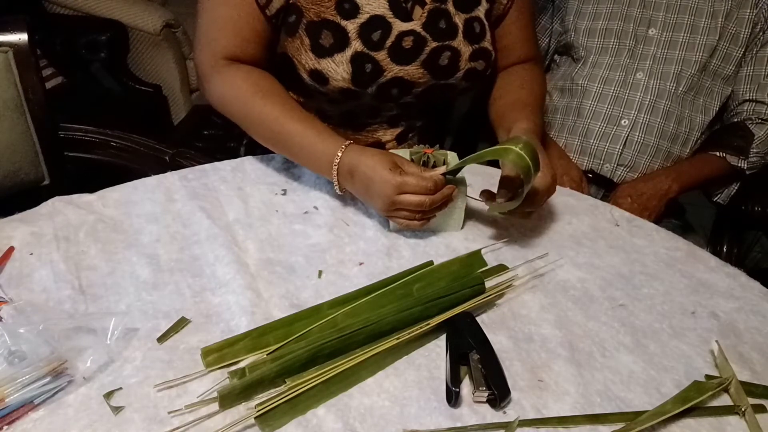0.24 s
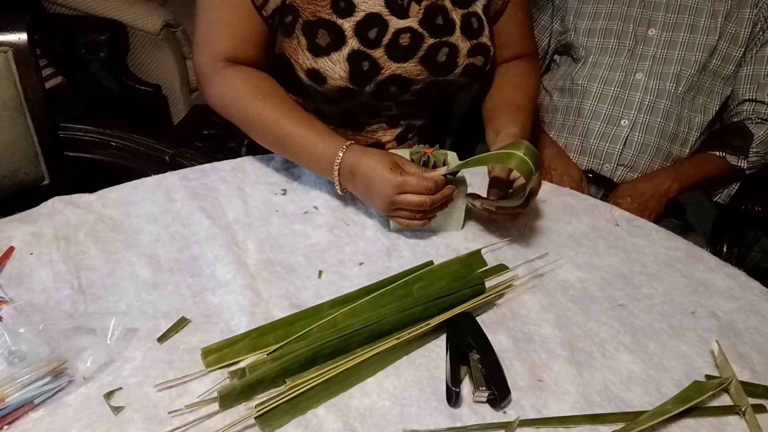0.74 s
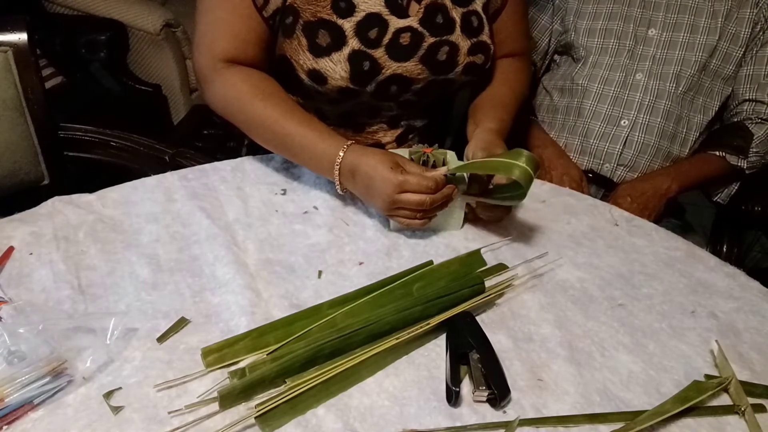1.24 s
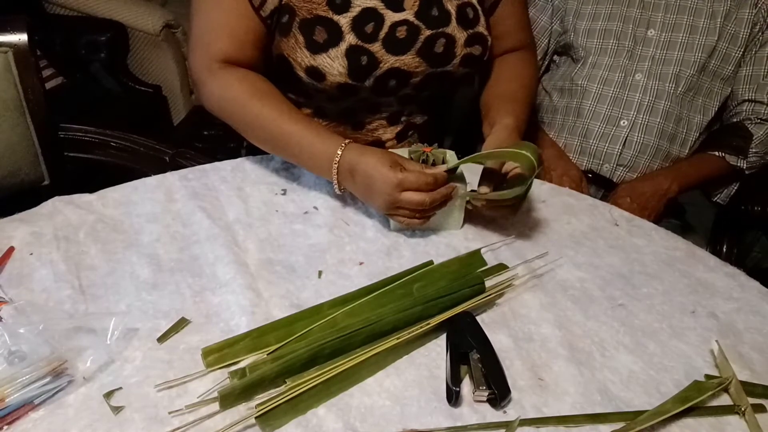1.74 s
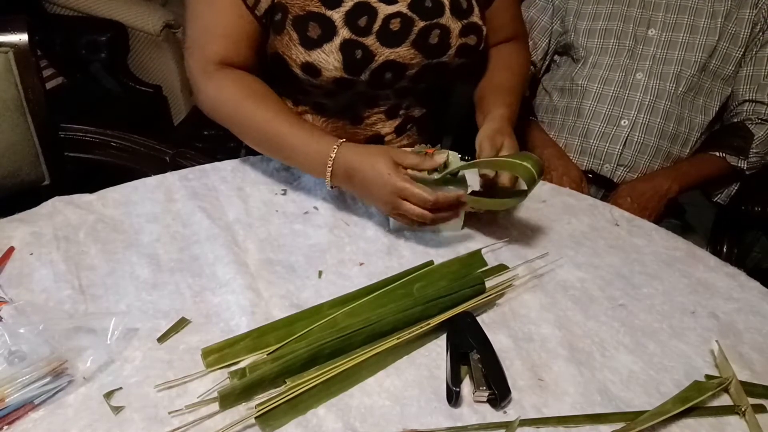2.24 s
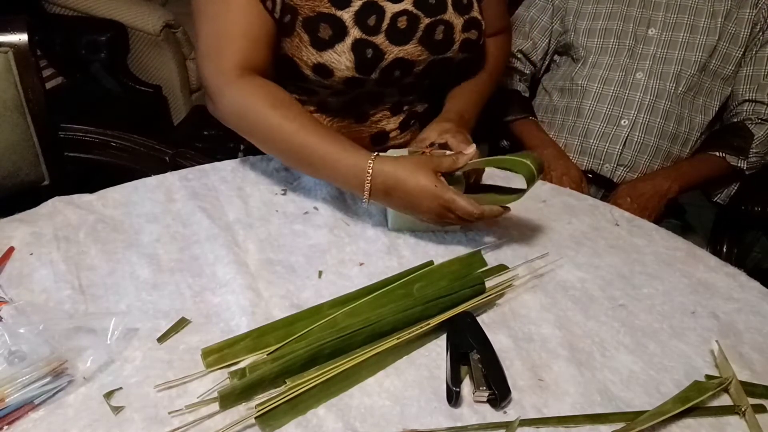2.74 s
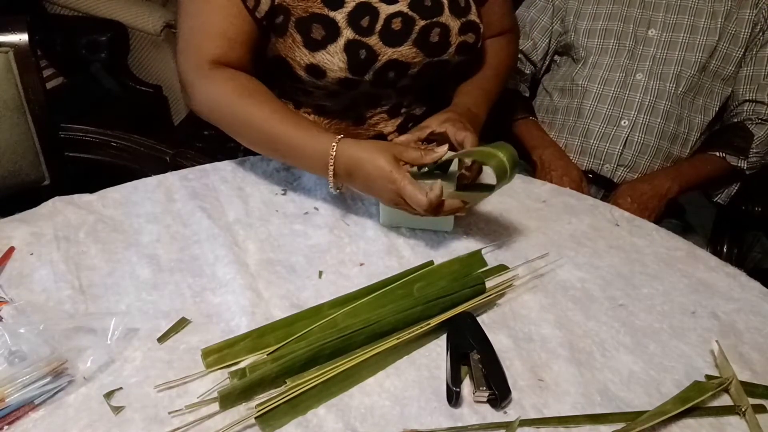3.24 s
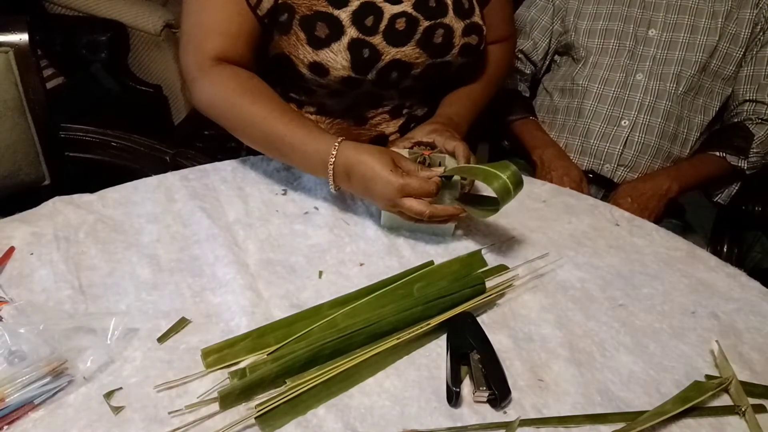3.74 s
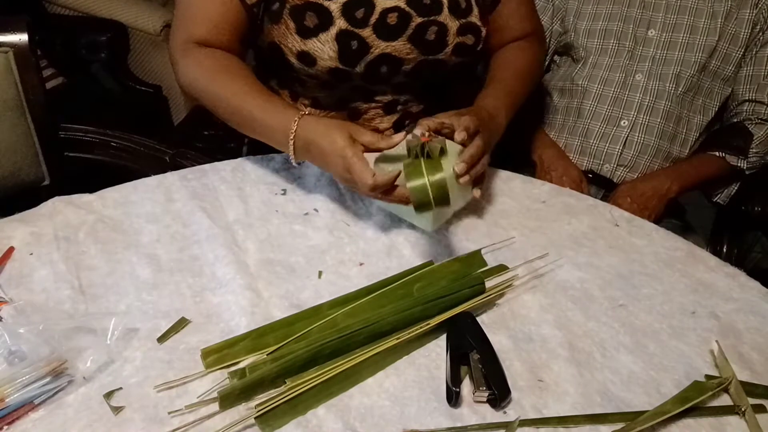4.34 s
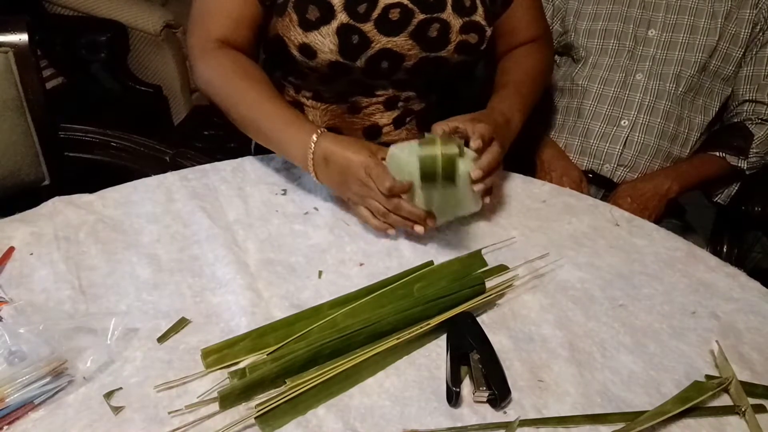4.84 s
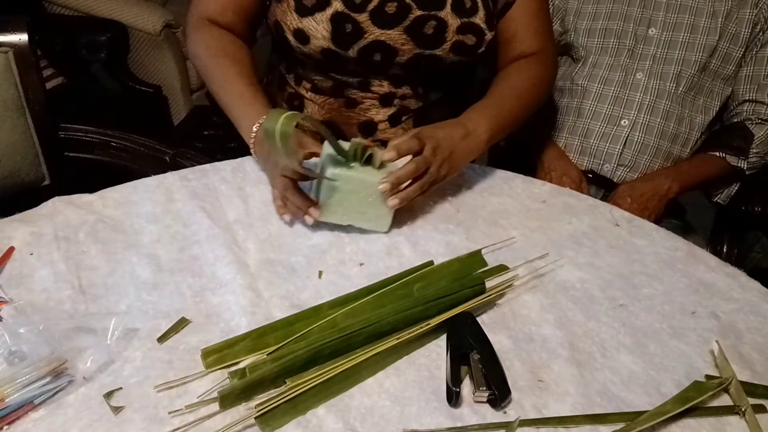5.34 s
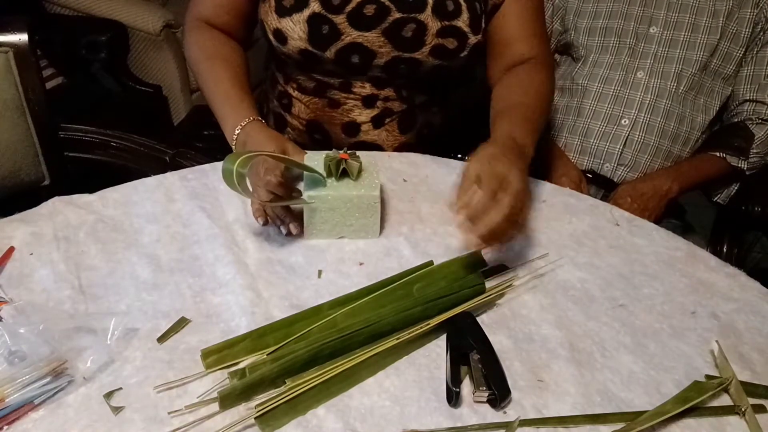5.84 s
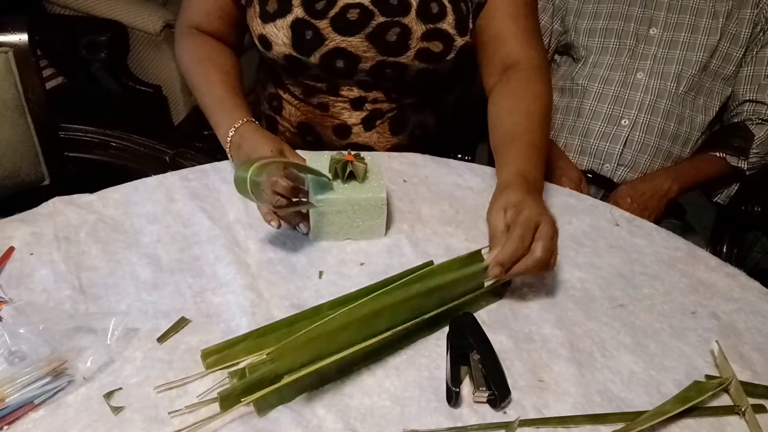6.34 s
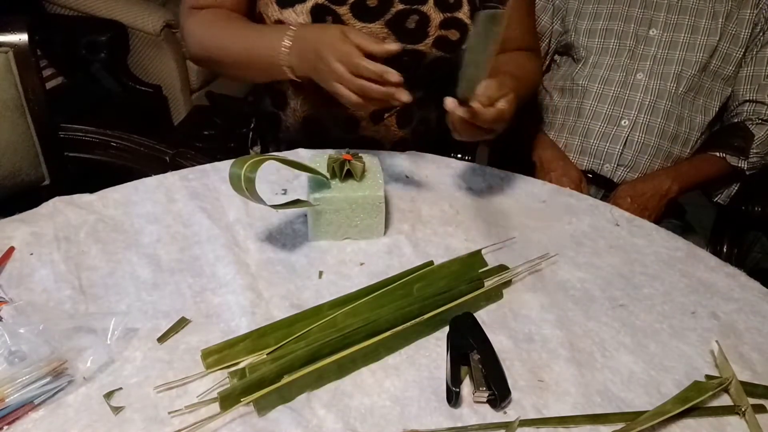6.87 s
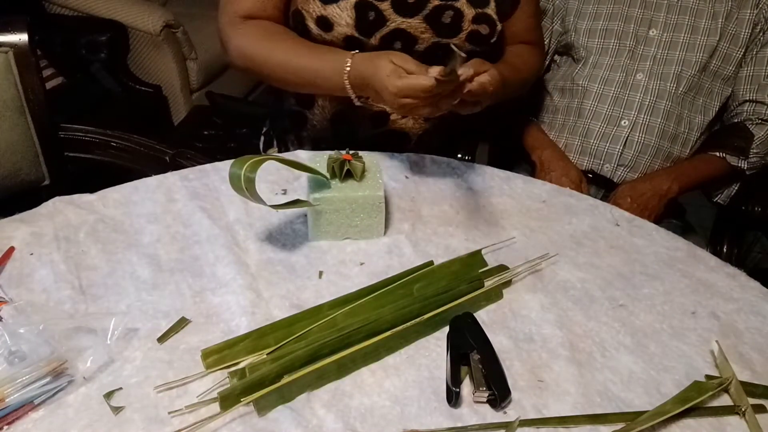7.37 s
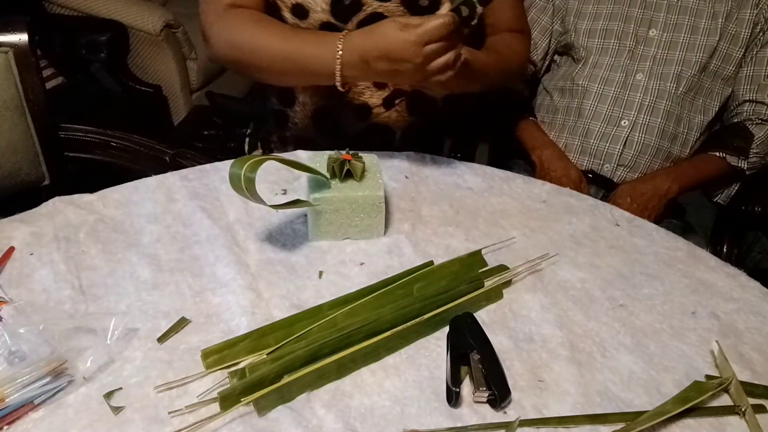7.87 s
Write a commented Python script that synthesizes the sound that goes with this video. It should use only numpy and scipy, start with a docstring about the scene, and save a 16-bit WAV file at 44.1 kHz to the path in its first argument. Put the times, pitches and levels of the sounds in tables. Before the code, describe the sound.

Brittle leaf sounds at a cloth-covered table, heard near and in stereo over low room noise. First come quick scratchy crackles with a slight low foam squeak, then quiet, then two bold rustling scrapes with sharp cracks, a short hollow knock and softer shuffling. Later a leaf strip is picked out with rapid clicks, and soft low bumps accompany its last rustling.

```python
"""Stiff leaf strips scrape as hands bend them and push them into a foam block on a cloth-covered table.
The scrape is stick-slip friction: noise in dense tiny slips, coloured by leaf, edges, block and table.
Snapping fibres are short decaying sines with a crack of noise, then a burst of slips.
Knocks of the block are millisecond pushes that ring the table top, with noisy rebounds.
A short indoor echo follows; room hum and microphone hiss lie behind, in a close stereo pair."""
import sys
import numpy as np
from scipy import signal
from scipy.fft import rfft, irfft
from scipy.io import wavfile
from scipy.ndimage import uniform_filter1d

SR = 44100
rng = np.random.default_rng(int(sys.argv[2]) if len(sys.argv) > 2 else 0)


def dump_mix(stems):
    """Bounce the given channels to the path in sys.argv[1] as a 16-bit WAV at rate SR."""
    frames = np.atleast_2d(stems).T  # one column per channel
    limited = np.clip(frames, -1, 1)  # hard clip at full scale
    pcm = np.round(limited * 32767).astype(np.int16)
    wavfile.write(sys.argv[1], SR, pcm)


N = 357518
HZ = np.fft.rfftfreq(N, 1 / SR)

# Resonances of the table top, rung by rubbing and by knocks.
# Each row: frequency in Hz, bandwidth in Hz, relative level in dB.
TABLE_MODES = [(125, 22, -3.5), (161, 38, 2), (233.7, 32, 10.5), (293, 91, 1.5), (412, 77, -1.5)]


def gain_of(db):
    """Level to amplitude: 20 dB is a factor of ten."""
    return 10 ** (np.asarray(db) / 20)


def evened(x):
    """Energy normalization: scales a signal to rms 1."""
    return x / np.sqrt(np.mean(x ** 2) + 1e-20)


def read(points, hz):
    """Interpolates a spectral curve along logarithmic frequency."""
    point_hz, value = np.transpose(points)
    return np.interp(np.log(hz + 1), np.log(point_hz + 1), value)


def add(mix, start_s, sound):
    """Superposition: adds a sound to the mix in place, cut off at the end."""
    part = mix[..., round(start_s * SR):][..., :sound.shape[-1]]
    part += sound[..., :part.shape[-1]]


def colour(x, gain):
    """Linear filtering by a frequency response scaled so that white noise keeps its rms."""
    return irfft(rfft(x) * gain / np.sqrt(np.mean(abs(gain) ** 2)), N)


def modes(table):
    """Modal superposition: the complex response of damped resonators side by side."""
    response = 0
    for hz, width_hz, db in table:
        damping = 1j * HZ * width_hz
        response = response + gain_of(db) * damping / (hz ** 2 - HZ ** 2 + damping)
    return response


def pair(two, likeness):
    """Interchannel coherence: the right shares part of the left's signal, by frequency."""
    right_late_s = 0.000025  # the hands sit a little nearer the left microphone
    same = np.clip(read(likeness, HZ), 0, 1)
    left, other = rfft(two)
    delayed = left * np.exp(-2j * np.pi * HZ * right_late_s)
    right = same * delayed + np.sqrt(1 - same ** 2) * other
    return irfft([left, right], N)


def strokes():
    """Friction follows the hand's effort: each stroke swells and fades, and stroke powers add."""
    # Strokes of the hands. Each row: time of the peak in seconds, peak level of the scraping in dB,
    # rise in seconds, fall in seconds, then three drives over the scraping in dB: the thin hiss
    # of the edges, the flap of the broad leaf, the drive of the block.
    stroke_rows = [(0.17, -64.5, 0.17, 0.1, -13, -6, -9), (0.604, -40.5, 0.078, 0.12, 5, -20, 0.5),
                   (0.805, -42, 0.033, 0.091, 3.5, -17, 0), (0.976, -36, 0.13, 0.15, 3, -16.5, -0.5),
                   (1.212, -48, 0.038, 0.12, 2.5, -12, -4), (1.298, -58.5, 0.088, 0.51, 6, -5.5, -10),
                   (1.427, -55, 0.11, 0.07, 4.5, -3.5, -7.5), (1.49, -60.5, 0.25, 0.29, 5.5, -11, 7.5),
                   (2.034, -58, 0.25, 0.19, -1, -8, -4), (2.758, -54.5, 0.26, 0.35, 0, -4.5, -5),
                   (2.898, -44, 0.041, 0.13, 0, -13.5, -21), (3.031, -42, 0.12, 0.18, -4, -12, -14),
                   (3.097, -31.5, 0.061, 0.16, -2.5, -7.5, -18.5),
                   (3.28, -55.5, 0.51, 0.34, -1, -9.5, -16.5), (3.47, -57, 0.82, 0.2, 2.5, -9.5, -6.5),
                   (3.924, -48.5, 0.098, 0.24, -2, -13.5, -13.5), (4.117, -44, 0.19, 0.87, 0, -1.5, -12.5),
                   (4.204, -35, 0.084, 0.14, -4, -12, -14.5), (4.269, -39.5, 0.24, 0.062, -6, -18, -14.5),
                   (4.455, -51, 0.078, 0.11, -2, -18, -10), (4.6, -64.5, 0.63, 0.64, 3, -34, -7),
                   (4.75, -63.5, 0.34, 0.64, 2.5, 5.5, -11.5), (4.928, -50.5, 0.11, 0.1, -4, -11, -17),
                   (5.013, -47, 0.22, .14, -2.5, -17, -16), (5.153, -47, 0.34, 0.13, -3, -17, -20.5),
                   (5.41, -55.5, 0.17, 0.41, 4, -14.5, -11), (5.519, -56, 0.23, 0.18, -5, -6, 3.5),
                   (5.627, -48, 0.21, 0.1, -0.5, -15, -15), (6.075, -54.5, 0.15, 0.15, -9, -0.5, -27),
                   (6.145, -57.5, 0.18, 0.55, 1.5, 0, -9), (6.3, -60.5, 0.19, 0.36, -7.5, -4, -11),
                   (6.53, -69, 0.34, 0.69, -40, -5.5, -30), (7.01, -69.5, 0.13, 0.19, -17, -20, -17),
                   (7.135, -66, 0.12, 0.13, -31, -22, -18), (7.44, -55, 0.25, 0.16, -3.5, -5, -35),
                   (7.931, -55.5, 0.15, 0.34, -9, -9.5, -16)]
    drop_db, roundness = 32, 0.89  # drop over one rise or fall; 1 = pointed top, 2 = round
    fidget_db = -85  # the hands never lie quite still
    t = np.arange(0, N + 64, 64)[:, None] / SR
    peak_s, db, rise_s, fall_s, *share_db = np.transpose(stroke_rows)
    away = np.where(t < peak_s, (peak_s - t) / rise_s, (t - peak_s) / fall_s)
    power = gain_of(np.maximum(db - drop_db * away ** roundness, -300)) ** 2
    total = power.sum(axis=1)
    rows = [np.sqrt(total + gain_of(fidget_db) ** 2)]
    # the stroke strongest at the moment weighs most in the shares
    rows += [gain_of(power @ share / total) for share in share_db]
    return [np.interp(np.arange(N) / SR, t[:, 0], row) for row in rows]


def slips(per_s, spread_db, ring_s, smooth):
    """Stick-slip: noise jumps in loudness at random slips and decays; a few slips are larger."""
    happens = rng.random(N) < per_s / SR
    size = gain_of(spread_db * np.minimum(rng.exponential(1, N), 3)) * happens
    bumps = signal.lfilter([1], [1, -np.exp(-1 / (ring_s * SR))], size)
    loudness = smooth + evened(bumps)  # smooth is the steady part
    return evened(loudness * rng.standard_normal((2, N)))


def bend(x, patchy_db):
    """Bending shifts a leaf's resonances: patches of colour come and go around a moving peak."""
    # Centre of the leaf's brightest rustle as it bends. Each row: time in seconds, frequency in Hz.
    bright_path = [(.8, 4250), (2, 3250), (3.1, 4290), (4.2, 4300), (5.15, 3900), (5.62, 6360), (6.2, 3720),
                   (7.4, 4600)]
    hz, t, z = signal.stft(x, SR, nperseg=512)
    octaves = np.log2((hz[:, None] + 1) / np.interp(t, *np.transpose(bright_path)))
    peak = gain_of(1.71 * np.exp(-(octaves / 0.26) ** 2))
    # random gains smoothed over 4 frequency bins and 7 frames, the same in both channels
    patches = rng.standard_normal(z.shape[1:])
    patches = uniform_filter1d(uniform_filter1d(patches, size=4, axis=0), size=7, axis=1)
    gain = gain_of(patchy_db * evened(patches))
    gain = gain / np.sqrt(np.mean(gain ** 2))
    return signal.istft(z * peak * gain, nperseg=512)[1][:, :N]


def shake(crack, crumble):
    """Source and filter: one grainy drive passes leaf, edges and block, and through these the table."""
    # Spectra of the leaf's rustle and of its edges' hiss.
    # Each row: frequency in Hz, relative spectral density in dB.
    leaf_db, edge_db = [(1350, -85), (2300, -19), (2910, -1), (4070, -3.5), (4510, -0.5), (5110, -2.5),
                        (6320, -0.5), (8360, -11), (9000, -8.5), (11700, -19.5), (19800, -120)], [(4410, -102.5), (7500, 0.5), (8630, -12), (11700, 9), (15100, 4.5)]
    # Resonances of the broad leaf, of the loose strip once gripped, and of the foam block.
    # Each row: frequency in Hz, bandwidth in Hz, relative level in dB.
    flap_modes, strip_modes, block_modes = [(1077, 580, -1), (1447, 120, 1), (1783, 48, 0.5),
                                            (2350, 530, -5.5)], [(1060, 720, -4.5), (1836, 350, 3.5),
                                                          (2340, 370, -1)], [(408.5, 43, -5), (520, 120, -1),
                                                                         (630, 50, -1), (711, 40, 6),
                                                                         (806, 35, 3)]
    strip_from_s = 5.9

    scrape, hiss_share, flap_share, block_share = strokes()
    strength = np.hypot(scrape, crumble)
    ticks = gain_of(-16.0) * slips(per_s=45, spread_db=5.5, ring_s=0.001, smooth=0.01)
    dense = slips(per_s=500, spread_db=6, ring_s=0.002, smooth=1.05)
    rub = strength * (dense + ticks)
    crack = crack * rng.standard_normal((2, N))
    drive = rub + crack
    hiss, flap = drive * hiss_share, drive * flap_share
    block = (rub + gain_of(-5.5) * crack) * block_share  # a crack moves the block less

    bright = colour(drive, gain_of(read(leaf_db, HZ))) + colour(hiss, gain_of(read(edge_db, HZ)))
    loose = np.arange(N) / SR > strip_from_s
    leaf = colour(flap * ~loose, modes(flap_modes)) + colour(flap * loose, modes(strip_modes))
    table = gain_of(-4.5) * block + gain_of(-11.5) * flap
    bent = bend(bright + leaf, patchy_db=2.1)
    return bent + colour(block, modes(block_modes)) + colour(table, modes(TABLE_MODES))


def air():
    """Stationary random noise: room hum and microphone hiss, with slowly drifting patches of level."""
    # Spectrum of the room. Each row: frequency in Hz, relative spectral density in dB.
    air_spectrum = [(20, -39), (94, 4.5), (190, -2), (248, 7.5), (305, -2), (534, -4.5), (963, -13.5),
                    (1940, -18.5), (2430, -21), (3220, -33), (5490, -18.5), (8130, -28.5), (12700, -19),
                    (15100, -23)]
    # Likeness of left and right. Each row: frequency in Hz, coherence from 0 to 1.
    air_likeness = [(60, 0.86), (240, 0.76), (950, 0), (15000, 0.05)]
    level_db = -60.5
    frames, hz = N // 512 + 5, np.fft.rfftfreq(2048, 1 / SR)
    a, b, c, d, patches = rng.standard_normal((frames, 1025, 5)).T
    patches = evened(uniform_filter1d(uniform_filter1d(patches, size=20, axis=0), size=8, axis=1))
    gain = gain_of(read(air_spectrum, hz)[:, None] + 1.6 * patches)
    z = np.array([a + 1j * b, c + 1j * d]) * gain
    noise = signal.istft(z, nperseg=2048, noverlap=1536)[1][:, :N]
    return gain_of(level_db) * pair(evened(noise), air_likeness)


def room(x, t60):
    """Diffuse reverberation: sparse echoes of random sign decay exponentially, unlike on each side."""
    taps = np.zeros((2, SR // 2))
    at = np.arange(200, SR // 2 - 20, 20)  # one tap in every 20 samples
    at = at + rng.integers(0, 20, (2, len(at)))
    np.put_along_axis(taps, at, rng.choice([-1., 1.], at.shape), 1)
    taps *= gain_of(-60 * np.arange(SR // 2) / SR / t60)
    return signal.fftconvolve(x, taps / np.linalg.norm(taps[0]), axes=1)[:, :N]


def snaps():
    """Sudden release of strain: a decaying ring with a crack, kept shaking by a burst of slips."""
    # Snapping fibres. Each row: start in seconds, peak level in dB before the offsets below,
    # ring in Hz, level of the crumbling after it in dB, T60 of the crumbling in seconds.
    snap_rows = [(0.528, -51, 4830, -57, 0.65), (0.5621, -26, 4920, -42, 0.27),
                 (0.5827, -26, 3190, -44, 0.068), (0.594, -23.5, 4100, -56, 0.071),
                 (0.6859, -35.5, 5000, -58.5, 0.2), (0.7457, -40.5, 4800, -55, 0.044),
                 (0.7726, -25, 4660, -40.5, 0.17), (0.8921, -34, 4780, -49.5, 0.064),
                 (0.917, -26, 3320, -39.5, 0.24), (1.0738, -24, 4960, -43, 0.36),
                 (1.175, -34, 3280, -54, 0.085), (1.1903, -21.5, 3080, -37.5, 0.11),
                 (1.2742, -35, 6900, -54.5, 0.32), (1.3311, -25, 4530, -48, 0.19),
                 (1.403, -33.5, 5340, -54, .09), (1.513, -40, 4300, -65, 0.034),
                 (1.8037, -40.5, 6150, -63, 0.098), (2.6372, -40.5, 5600, -63, 0.43),
                 (2.899, -22, 3700, -57, 0.05), (3.03, -28, 5840, -47, 0.1),
                 (3.2374, -40, 6760, -53.5, 0.25), (3.3466, -35.5, 7100, -55.5, 0.23),
                 (3.469, -32.5, 4630, -65, 0.063), (4.1902, -30, 3230, -32, 0.031),
                 (4.2002, -18.5, 7300, -50, 0.074), (4.263, -27, 4600, -50, 0.17),
                 (4.399, -49.5, 1896, -52, 0.27), (4.6696, -32.5, 4640, -52, 0.75),
                 (5.373, -37, 6740, -64, 0.15), (5.438, -37, 2700, -55, 0.17), (6.065, -47, 4900, -64, .05),
                 (6.08, -36, 4380, -68, .05), (6.0952, -41, 3600, -66, .05), (6.1128, -33, 3400, -62, .05),
                 (6.1308, -35.5, 4740, -49.5, 0.042), (6.14, -34.5, 4180, -73, .06),
                 (6.201, -43, 2980, -51.5, 0.14), (6.2462, -25, 2445, -53, 0.077),
                 (6.27, -32.5, 1820, -52, 0.099), (6.33, -37.5, 3720, -69, .06),
                 (6.337, -38, 4170, -57, 0.086), (6.343, -37, 3430, -66, .06),
                 (6.4717, -42, 3740, -74, 0.14), (6.553, -42.5, 4000, -94, .09),
                 (7.3076, -41.5, 3920, -55, 0.16), (7.359, -41, 6400, -51, 0.23),
                 (7.373, -30.5, 4930, -58, 0.15), (7.379, -36, 1940, -61, 0.092),
                 (7.45, -41, 4270, -58, .08), (7.5223, -48, 1810, -60.5, 0.26),
                 (7.635, -48, 6850, -57.5, 0.066)]
    clicks, bursts, t = np.zeros((2, N)), np.zeros((2, N)), np.arange(SR // 2) / SR
    for start_s, db, hz, crumble_db, t60 in snap_rows:
        turn = rng.random((2, 1))  # starting phase in cycles, left and right
        shaking = evened(uniform_filter1d(rng.standard_normal((2, len(t))), size=60))
        crumble = gain_of(crumble_db - 60 * t / t60)
        fade = gain_of(db - 5.5 - 60 * t / 0.012) + shaking * gain_of(-3) * crumble
        onset = 1 - np.exp(-t / 0.000064)
        add(clicks, start_s, np.sin(2 * np.pi * (hz * t + turn)) * fade * onset)
        crack = gain_of(db - 7.0 - 60 * t / 0.0087) * np.minimum(t / 0.0008, 1)
        add(bursts, start_s, np.array([crack, crumble]))  # loudness curves for the noise in shake
    return clicks, bursts


def knocks():
    """Impact excitation: a brief soft push and noisy rebounds ring the table's modes."""
    # Knocks of the block. Each row: start in seconds, peak level in dB before the offsets below,
    # time for the push to peak in seconds, T60 of the rebounds in seconds.
    knock_rows = [(1.119, -34, 0.00064, 0.84), (4.4133, -23.5, 0.0004, 0.34), (4.4179, -29, 0.00063, 0.089),
                  (6.009, -39.5, 0.0025, 0.77), (7.402, -38.5, 0.0039, 0.58), (7.421, -38.5, 0.0026, 0.51),
                  (7.436, -35, 0.0025, 0.49)]
    # The air squeezed under the landing block.
    # Each row: frequency in Hz, bandwidth in Hz, relative level in dB.
    thud_modes = [(265, 75, 0)]
    push, thud, t = np.zeros((2, N)), np.zeros(N), np.arange(SR // 2) / SR
    for start_s, db, push_s, t60 in knock_rows:
        jostle = rng.standard_normal((2, len(t)))
        # a softer, longer push also has duller rebounds
        soft = signal.lfilter([1], [1, -np.exp(-1 / (0.51 * push_s * SR))], jostle)
        land = t / push_s * np.exp(1 - t / push_s)
        add(thud, start_s, gain_of(db - 17.5) * land)
        blow = 0.2 * land + 0.35 * evened(soft) * gain_of(-60 * t / t60)
        add(push, start_s, gain_of(db - 20.5) * blow)
    return colour(push, modes(TABLE_MODES)) + colour(thud, modes(thud_modes))


def scene():
    """Superposition of direct sound, the room's echo of it and the room's own air."""
    # Likeness of left and right for the near sounds. Each row: frequency in Hz, coherence from 0 to 1.
    near_likeness = [(60, 0.44), (180, 1), (550, 0.61), (1650, 0.35), (4970, 0.22), (15000, 0.083)]
    clicks, bursts = snaps()
    near = shake(*bursts) + clicks + knocks()
    echo = gain_of(-6.5) * room(near, t60=0.098)
    return pair(near + echo, near_likeness) + air()


def record(dry):
    """Transducer response: the microphones differ in colour, lose deep bass and are band-limited."""
    # Colour of the pair. Each row: frequency in Hz, left over right in dB.
    lean_db = [(60, 2), (240, 2), (950, 1.5), (15000, -2.5)]
    bass_cut_hz, edge_hz = 72, 16000
    lean = gain_of(np.outer([0.5, -0.5], read(lean_db, HZ)))
    bass_cut = 1 / np.sqrt(1 + (bass_cut_hz / (HZ + 1)) ** 6)
    tilted = irfft(rfft(dry) * lean * bass_cut, N)
    lowpass = signal.firwin(511, edge_hz, window=("kaiser", 9), fs=SR)
    return signal.oaconvolve(tilted, lowpass[None], "same")


dry = scene()
out = record(dry)
dump_mix(out)
```